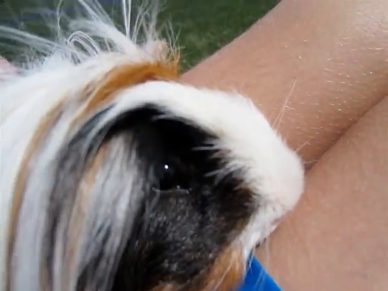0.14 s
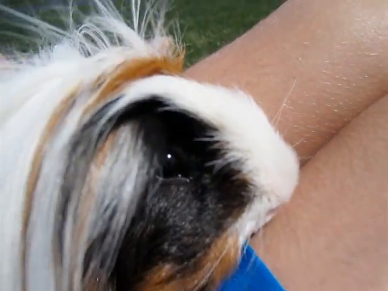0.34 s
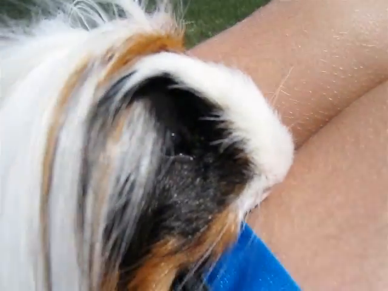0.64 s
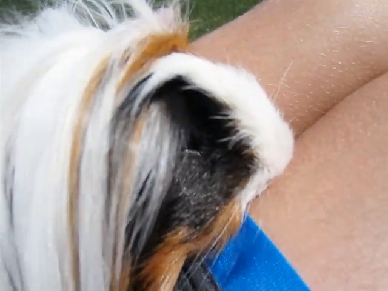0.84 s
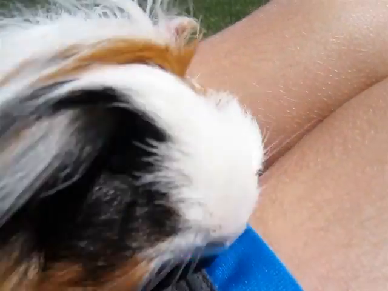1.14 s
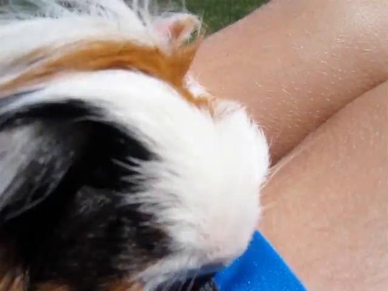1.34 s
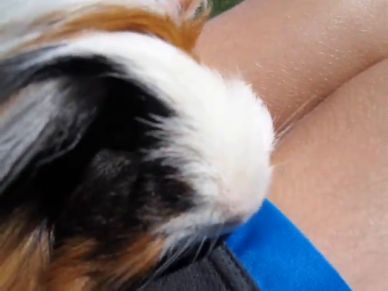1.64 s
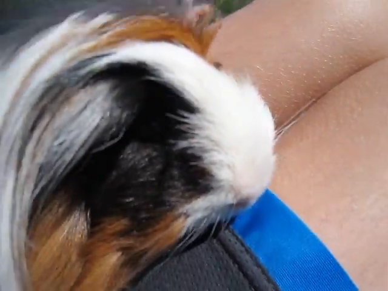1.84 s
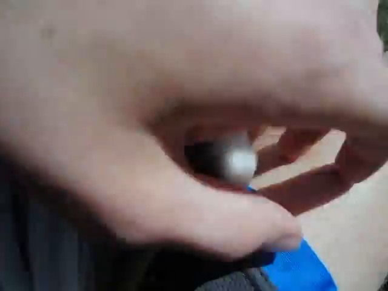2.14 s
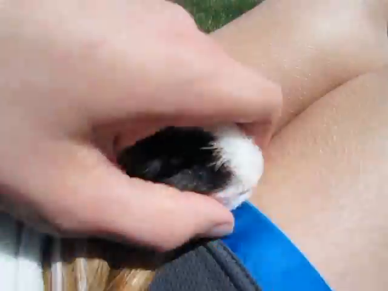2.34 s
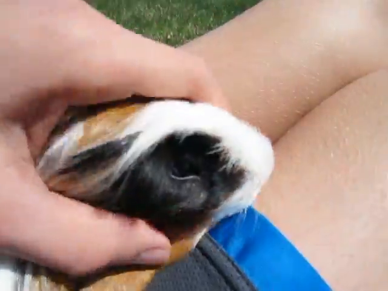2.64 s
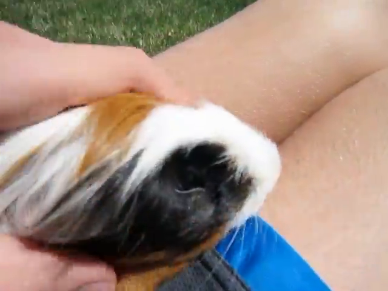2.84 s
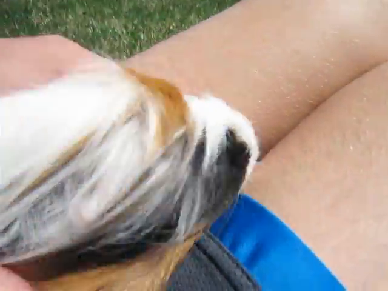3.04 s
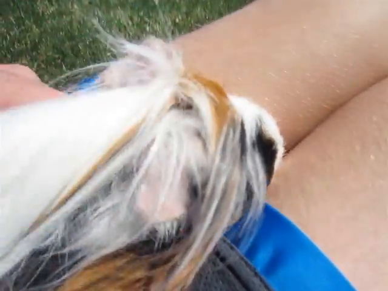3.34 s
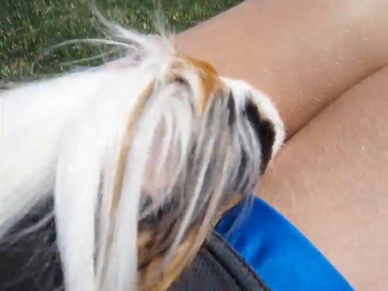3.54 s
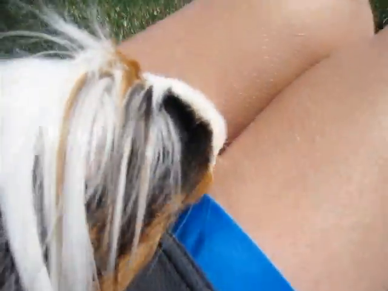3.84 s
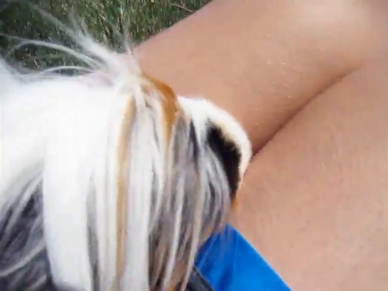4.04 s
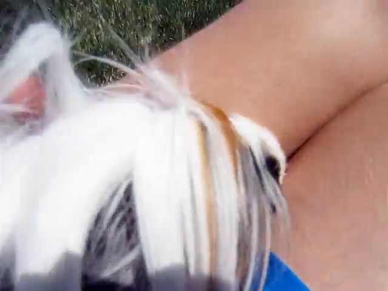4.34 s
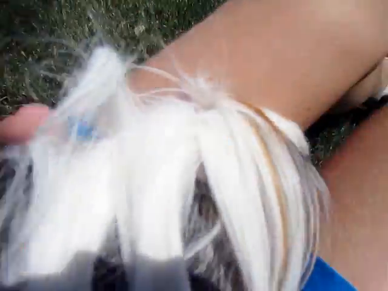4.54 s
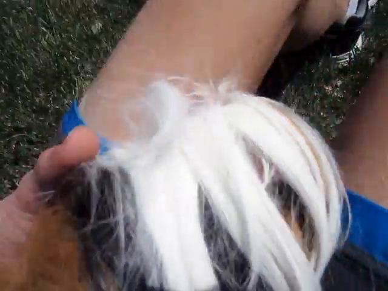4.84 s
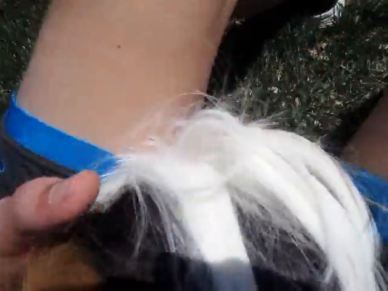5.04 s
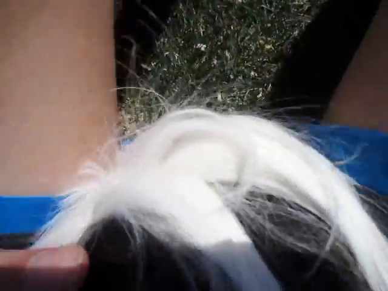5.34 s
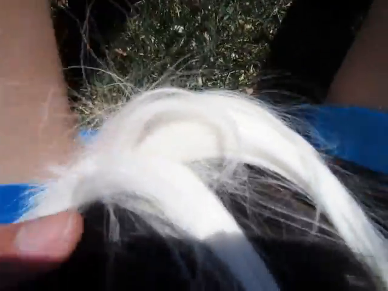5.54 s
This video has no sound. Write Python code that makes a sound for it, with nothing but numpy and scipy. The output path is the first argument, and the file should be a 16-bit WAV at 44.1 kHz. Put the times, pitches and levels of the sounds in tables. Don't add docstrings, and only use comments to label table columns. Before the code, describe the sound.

Quiet open air with a low distant engine hum; faint cloth creak and two hoarse bird calls at first. Then a small animal close by gives brief, knocking, hollow squeaks, sparse at first and soon in rapid groups, fading out before the end. Dry fur rustles under a stroking hand, strongest past the middle, and sharp handling clicks cluster last. Close handheld stereo microphone, almost no echo.

```python
import sys
import numpy as np
from scipy import signal
from scipy.fft import rfft, irfft
from scipy.io import wavfile
from scipy.ndimage import uniform_filter1d

SR = 44100
rng = np.random.default_rng(int(sys.argv[2]) if len(sys.argv) > 2 else 0)


def unload_wav(signal):
    wavfile.write(
        sys.argv[1],
        SR,
        np.round(np.clip(np.atleast_2d(signal).T, -1, 1) * 32767).astype(np.int16),
    )


def magnitude_from_level(level_db):
    exponent = np.asarray(level_db, float) / 20
    return 10 ** exponent


N = 250929

# (multiple of pitch, level [dB])
OVERTONES = [(2, 0), (3, -5), (4, -8)]
# (time [s], overtones re pitch [dB])
PRESS = [(.9, -21), (2.3, -28), (2.42, -20), (2.63, -27), (2.69, -25), (2.72, -27), (2.97, -24.5),
         (3.05, -18), (3.25, -15), (3.35, -16), (3.54, -15.5), (3.6, -11.5), (3.85, -19), (4.1, -15.5),
         (4.42, -15), (4.65, -19), (4.9, -19.5)]


def in_time(rows):
    s, *columns = np.transpose(rows)
    return [np.interp(np.arange(N) / SR, s, c) for c in columns]


def at_hz(points, hz):
    point_hz, level = np.transpose(points)
    return np.interp(np.log(hz), np.log(point_hz), level)


def rms_one(x):
    return x / np.sqrt(np.mean(x ** 2) + 1e-20)


def drift(rate):
    r = np.exp(-2 * np.pi * rate / SR)
    settling = 20000
    noise = rng.standard_normal(N + settling)
    return rms_one(signal.lfilter([1], [1, -2 * r, r * r], noise)[settling:])


def phase_of(hz):
    return 2 * np.pi * np.cumsum(hz) / SR


def filtered(x, order, hz, kind):
    return signal.sosfilt(signal.butter(order, hz, kind, fs=SR, output="sos"), x)


def banded_noise(spectrum, patchy_db):
    # (frequency [Hz], left-right correlation [-1..1])
    likeness = [(30, -0.96), (60, -0.42), (150, -0.33), (500, -0.53), (1500, -0.24), (5000, 0.24),
                (15000, 0.56)]
    out, edges = 0, 20 * 2 ** (np.arange(30) / 3)
    white = rng.standard_normal((2, 2, N))
    flicker = [drift(17.0) for k in range(3)]
    for k, (low, high) in enumerate(zip(edges, edges[1:])):
        hz = np.sqrt(low * high)
        if spectrum[0][0] < hz < spectrum[-1][0]:
            mid, side = filtered(white[k % 2], 3, [low, high], "band")
            alike = np.clip(at_hz(likeness, hz), -1, 1)
            gain = magnitude_from_level(at_hz(spectrum, hz) + patchy_db * flicker[k % 3])
            out = out + gain * (np.sqrt(1 + alike) * mid + np.sqrt(1 - alike) * side * [[1], [-1]])
    return out / np.sqrt(np.mean(out.mean(axis=0) ** 2))


def faint_tone(rows, rough):
    hz, level_db = in_time(rows)
    t = np.arange(N) / SR
    gate = np.clip(np.minimum(t - rows[0][0], rows[-1][0] - t) / 0.034, 0, 1)
    level = magnitude_from_level(level_db + 80 * rough * drift(70))
    return np.sqrt(2) * gate * level * np.sin(phase_of(hz * (1 + rough * drift(90))))


def air():
    # (frequency [Hz], spectral density [dB])
    air_spectrum = [(20, -12), (50, 0.5), (150, 1.5), (400, -6.5), (1000, -9.5), (2000, -29.5),
                    (4000, -31.5), (16000, -38.5)]
    return magnitude_from_level(-56) * banded_noise(air_spectrum, patchy_db=2.5)


def motor():
    # (time [s], frequency [Hz], level [dB])
    first_order = [(0.0, 84.3, -56), (0.33, 83.9, -48.5), (0.41, 83.8, -60), (0.49, 84.83, -52.5),
                   (1.19, 82.2, -51), (1.54, 78.6, -50), (1.63, 79.1, -69), (1.85, 78.2, -49.5),
                   (2.34, 84.16, -51.5), (2.42, 82.8, -48.5), (2.57, 82.77, -52.5), (5.1, 82.92, -53),
                   (5.69, 83, -48.5)]
    # (time [s], level [dB])
    second_order = [(0.0, -65), (0.2, -50.5), (0.58, -67.5), (0.65, -57), (0.95, -69), (2.57, -56.5),
                    (3.14, -74), (3.26, -49.5), (3.41, -72.5), (5.05, -57.5), (5.2, -80), (5.69, -57.5)]
    hz, first_db = in_time(first_order)
    phase = phase_of(hz + 0.573 * drift(5.6))
    first = magnitude_from_level(first_db + 1.2 * drift(4.5) + 0.68 * drift(40)) * np.sin(phase)
    second = magnitude_from_level(in_time(second_order)[0] + drift(20)) * np.sin(1.96 * phase)
    third = magnitude_from_level(-67 + 3 * drift(3)) * np.sin(2.95 * phase)
    return np.sqrt(2) * (first + second + third)


def bird():
    # (start [s], length [s], level [dB])
    call_times = [
        (.275, .18, -61),
        (.55, .14, -62),
        (.72, .1, -68),
    ]
    # (frequency [Hz], width [Hz], level [dB])
    throat_bands = [(1000, 83, -3), (1546, 36, -2.5), (1620, 39, -2.5), (1710, 55, -13), (2300, 80, -20)]
    # (time [s], frequency [Hz], level [dB])
    cores = [
        [(.275, 1560, -66), (.36, 1545, -67), (.46, 1530, -71)],
        [(.55, 1600, -68), (.62, 1560, -68), (.69, 1530, -70)],
    ]
    rise_s, sag_db = 0.0098, -5
    t, white = np.arange(N) / SR, rng.standard_normal(N)
    breath, calls = 0, 0
    for hz, width, db in throat_bands:
        breath = breath + magnitude_from_level(db) * rms_one(filtered(white, 1, [hz - width / 2, hz + width / 2], "band"))
    for s, length, db in call_times:
        knots = [s, s + rise_s, s + length, s + length + 2 * rise_s]
        calls = calls + magnitude_from_level(db) * np.interp(t, knots, [0, 1, magnitude_from_level(sag_db), 0])
    return breath * calls + sum(faint_tone(core, rough=0.02) for core in cores)


def cloth():
    # (time [s], frequency [Hz], level [dB])
    groan = [
        (4.79, 160.6, -55),
        (4.858, 204, -43),
        (4.93, 196, -62),
    ]
    # (time [s], frequency [Hz], level [dB])
    creak = [
        (.04, 650, -75),
        (.15, 709, -60.5),
        (.23, 660, -56),
    ]
    return faint_tone(groan, rough=0.015) + faint_tone(creak, rough=0.07)


def stroking_db():
    # (peak [s], swell [s], fade [s], level [dB])
    strokes = [(.177, 0.12, 0.11, -63.5), (1.63, 0.037, 0.17, -74), (1.95, .08, 0.35, -70),
               (2.174, 0.031, 0.049, -60), (2.27, 0.079, 0.16, -66), (2.68, 0.18, 0.15, -66.5),
               (3.08, 0.05, 0.11, -59), (3.15, 0.1, 0.098, -58.5), (3.55, 0.4, 0.33, -65),
               (3.97, 0.072, 0.25, -60), (4.2, 0.085, 0.054, -55.5), (4.25, 0.056, 0.026, -57),
               (4.497, 0.13, 0.031, -61.5), (4.74, 0.044, 0.045, -58), (4.805, 0.036, 0.02, -51),
               (4.9, 0.096, 0.14, -61), (5.17, 0.091, .05, -65.5), (5.3, 0.0444, 0.1, -68.5),
               (5.445, 0.035, 0.44, -66)]
    flank_db, resting_db = 7.5, -75
    t = np.arange(0, N / SR + .002, .002)
    power = magnitude_from_level(resting_db) ** 2
    for s, swell, fade, db in strokes:
        power = power + magnitude_from_level(db - flank_db * np.abs(t - s) / np.where(t < s, swell, fade)) ** 2
    return in_time(np.transpose([t, 10 * np.log10(power)]))[0]


def hand():
    # (frequency [Hz], spectral density [dB])
    fur_spectrum = [(2000, -21), (3000, -4.5), (4500, -0.5), (7500, -1), (10000, -3.5), (17000, 0)]
    # (frequency [Hz], spectral density [dB])
    rub_spectrum = [(200, 1), (300, 7.5), (700, -1), (1600, -3.5), (2500, -8.5), (4500, -24.5)]
    # (time [s], level of the top treble [dB])
    sheen = [(0, -3), (2.18, 3.5), (2.27, 7.5), (2.4, -4), (3.12, -4), (4.0, -10), (4.2, -5.5), (4.5, 0),
             (4.8, 3), (5.69, -3.5)]
    hiss_db = stroking_db()
    rub_db = -59.5 + 0.61 * (hiss_db + 70)
    firmness = np.clip((hiss_db + 64.0) / 8, .2, 1)
    grain_db = firmness * np.clip(3.1 * drift(300) + 0.51 * drift(30), -7, 5.5)
    fur = banded_noise(fur_spectrum, patchy_db=2.0)
    treble = signal.sosfiltfilt(signal.butter(2, 8900, "high", fs=SR, output="sos"), fur)
    fur = fur + (magnitude_from_level(in_time(sheen)[0]) - 1) * treble
    return magnitude_from_level(hiss_db + grain_db + 2.5) * fur + magnitude_from_level(rub_db) * banded_noise(rub_spectrum, patchy_db=2.3)


def zip_of_hair():
    # (peak [s], width [s], frequency [Hz], level [dB])
    caught_lock = (3.105, .04, 4450, -70)
    s, width, hz, db = caught_lock
    band = filtered(rng.standard_normal(N), 2, [hz * 0.99, hz * 1.01], "band")
    return rms_one(band) * magnitude_from_level(db + 3.0 * drift(60)) * np.exp(-((np.arange(N) / SR - s) / width) ** 2)


def ticks():
    # (time [s], peak level [dB], softness [ms])
    contacts = [(0.244, -38.5, 0.17), (0.8096, -48, 0.057), (1.432, -38.5, 0.24), (3.015, -38.5, 0.015),
                (3.472, -58, 0.017), (3.619, -57.5, 0.023), (2.184, -37, 0.024), (2.243, -39, 0.016),
                (4.2058, -35, 0.025), (4.286, -49, 0.036), (4.7945, -34.5, .02), (5.276, -36, 0.065),
                (5.2972, -42, 0.07), (5.3099, -29.5, 0.039), (5.4293, -33, 0.071), (5.4369, -33, 0.032),
                (5.4473, -28.5, 0.027), (5.4608, -36.5, 0.032), (5.4666, -36, 0.049), (5.532, -36.5, 0.035),
                (5.5485, -27.5, 0.012), (5.558, -38, 0.036), (5.6884, -35.5, 0.048)]
    lead_s = .0004
    out, t = np.zeros(N + 300), np.arange(300) / SR
    for s, level_db, soft_ms in contacts:
        soft = np.clip(soft_ms, .015, .35) / 1000
        dip = np.exp(-((t - lead_s) / soft) ** 2)
        rebound = 0.49 * np.exp(-((t - .0007) / 0.00032) ** 2)
        rattle = signal.lfilter([1], [1, -np.exp(-1 / (soft * SR))], rng.standard_normal(300))
        rattle = 0.19 * rms_one(rattle) * np.exp(-t / 0.00086)
        at = round((s - lead_s) * SR)
        out[at:at + 300] += magnitude_from_level(level_db + 5.0) * (rebound - dip + rattle)
    return filtered(out[:N], 1, 500, "high") * magnitude_from_level([[-.8], [.8]])


def rasp():
    return rms_one(filtered(rng.standard_normal(N), 1, [1100, 2300], "band"))


def overtones(phase, press_db, thinning_db):
    slack_db = np.clip(-12 - press_db, 0, 8)
    out = 0
    for k, db in OVERTONES:
        level = magnitude_from_level(db - thinning_db * np.sqrt(k - 1) - slack_db * (k - 2))
        out = out + level * np.cos(k * phase + .6 * k)
    return out


def flick(s, length, from_hz, to_hz, level_db):
    attack_s, shoulder_db, glide_bend = 0.0024, 1, 1.29
    release_s, release_share = .005, .2
    shoulder_s = max(length * (1 - release_share) - release_s, attack_s * 1.44)
    t = np.linspace(0, length, 24)
    size = np.interp(t, [0, attack_s, shoulder_s, length], magnitude_from_level([-35, 0, shoulder_db, -35]))
    hz = from_hz + (to_hz - from_hz) * (t / length) ** glide_bend
    return np.transpose([s + t, hz, level_db + 20 * np.log10(size)])


def whistles():
    # (time [s], pitch [Hz], peak level [dB])
    glides = [
        [(2.677, 1010, -40), (2.68, 1050, -26), (2.686, 1150, -30), (2.694, 1220, -32), (2.699, 1210, -38),
         (2.701, 1050, -41)],
        [(2.343, 560, -45), (2.35, 626, -37), (2.359, 730, -30), (2.366, 750, -35), (2.369, 800, -56)],
        [(4.036, 645, -41), (4.039, 661, -30.5), (4.057, 727, -22.5), (4.062, 672, -26), (4.069, 696, -28),
         (4.072, 780, -34)],
        [(4.1135, 740, -48), (4.117, 713, -21.5), (4.128, 762, -20.5), (4.135, 687, -25.5), (4.1375, 890, -20),
         (4.1395, 900, -52)],
        [(3.233, 690, -49), (3.2395, 713, -27.5), (3.243, 712, -24), (3.25, 743, -24.5), (3.254, 850, -22.5),
         (3.256, 900, -44)],
        [(3.811, 582.5, -38), (3.818, 653, -34), (3.829, 718, -25), (3.842, 703, -26), (3.848, 780, -23),
         (3.854, 985, -21.5), (3.858, 1065, -26), (3.862, 1270, -50)],
        [(3.5395, 940, -42), (3.5415, 985, -19.5), (3.544, 1050, -17.5), (3.548, 1120, -28), (3.552, 1230, -41),
         (3.554, 1250, -50)],
        [(4.323, 660, -31), (4.326, 679, -28.5), (4.337, 775, -19.5), (4.345, 690, -27), (4.349, 766, -21),
         (4.351, 912, -48)],
        [(4.419, 780, -43), (4.422, 734, -31), (4.426, 688, -24), (4.433, 667, -32), (4.436, 810, -27),
         (4.439, 700, -54)],
    ]
    # (start [s], length [s], from [Hz], to [Hz], peak level [dB])
    flicks = [(0.897, 0.028, 612, 746, -30), (2.341, 0.018, 1136, 1400, -42.5),
              (2.4213, 0.0097, 1025, 1150, -37.5), (2.63, 0.021, 710, 870, -27),
              (2.713, 0.017, 833, 724, -23), (2.97, 0.0098, 900, 1000, -21), (3.051, 0.011, 997, 1250, -19),
              (3.2295, 0.0055, 890, 1050, -27), (3.2342, 0.0044, 1065, 960, -28),
              (3.272, 0.0056, 960, 1320, -21.5), (3.344, 0.013, 936, 1045, -17.5),
              (3.623, 0.0074, 962, 1420, -20.5), (4.072, 0.016, 825, 1220, -18.5),
              (4.142, 0.026, 802, 1288, -20), (4.207, 0.022, 384, 400, -42.5),
              (4.365, 0.014, 947, 1320, -17.5), (4.441, 0.012, 785, 590, -28),
              (4.659, 0.016, 815, 990, -24.5), (4.884, 0.014, 1150, 1390, -36),
              (4.889, 0.03, 703, 795, -28.5)]
    # (time [s], width [s], half-pitch line re pitch [dB])
    doubling = [(2.42, 0.019, 2), (2.692, 0.014, -0.5), (3.841, 0.0064, -13), (4.067, 0.0038, -11.5),
                (4.133, 0.0029, -13), (4.43, 0.031, -16), (3.236, 0.0066, -9.5), (4.348, 0.0018, -8.5),
                (4.891, 0.0063, -14)]
    unsteady, breath_db = .06, -19
    out, wobble, clock = np.zeros(N), drift(220), np.arange(N) / SR
    half = magnitude_from_level(-37.0) + sum(magnitude_from_level(db) * np.exp(-((clock - s) / width) ** 2) for s, width, db in doubling)
    press_db, = in_time(PRESS)
    breath = rasp()
    for rows in glides + [flick(*n) for n in flicks]:
        s, hz, level_db = np.transpose(rows)
        span = np.arange(int(s[0] * SR), int(s[-1] * SR) + 40)
        t = span / SR
        size = uniform_filter1d(np.interp(t, [*s, t[-1]], [*magnitude_from_level(level_db), 0]), size=24)
        pitch = np.interp(t, s, hz)
        alternation = np.minimum(half[span], .3)
        waver = (.01 + unsteady * alternation) * wobble[span]
        phase = phase_of(pitch * (1 + waver)) + rng.uniform(0, 2 * np.pi)
        thinning_db = 6.8 * np.clip((pitch - 760) / 150, 0, 1)
        edge = magnitude_from_level(press_db[span] + 0.73 * wobble[span - 400]) * overtones(phase, press_db[span], thinning_db)
        gush_db = press_db[span] + breath_db + 20 * alternation - thinning_db
        edge += magnitude_from_level(gush_db) * breath[span] * (1 + np.cos(phase))
        edge *= (size.max() / (size + 1e-4)) ** 0.45
        subharmonic = half[span] * (np.cos(phase / 2) + 0.18 * np.cos(1.6 * phase))
        out[span] += size * (np.cos(phase) + edge + subharmonic)
    return out


def chuts():
    # (time [s], peak level [dB], ring [Hz], length [ms], chest re ring [dB])
    closures = [(0.89, -28, 933, 3.2, 1.5), (0.894, -33, 1050, 4.9, -16), (1.0804, -35, 700, 4.1, -27),
                (1.0837, -24.5, 694, 3.1, -19), (1.0878, -27, 750, 1.1, -19),
                (1.0907, -23.5, 920, 1.4, -17), (1.106, -30.5, 800, 2.8, -5.5),
                (1.1484, -35, 645, 2.9, -25), (1.1522, -25.5, 730, 4.7, -24),
                (1.1581, -22.5, 940, 1.3, -17.5), (1.1752, -29, 803, 3.7, -16),
                (2.1403, -32.5, 1040, 4.3, 1.5), (2.1583, -35.5, 646, 3.8, -20),
                (2.3224, -29.5, 940, 4.1, 5), (2.3324, -30, 1040, 4, 3.5), (2.3391, -34, 650, 1.5, -20),
                (2.341, -28, 905, 1.8, -16), (2.3446, -29, 650, 1.7, -20), (2.4072, -31, 1000, 3.5, 7.5),
                (2.4101, -24.0, 930, 5, -10), (2.4146, -35, 1060, 5.1, -12), (2.4203, -32, 1035, 3.6, 2),
                (2.5959, -32.0, 900, 1.97, 3), (2.5984, -28.5, 965, 4.3, -4.5),
                (2.6031, -31, 650, 3, -24), (2.6069, -25, 970, 1.9, -11), (2.6099, -34.5, 744, 3.6, -20),
                (2.613, -24.5, 950, 1.8, -17), (2.6205, -29, 750, 5.4, -20),
                (2.6261, -27.5, 807, 3.6, -18), (2.6674, -23, 930, 3.8, -0.5),
                (2.6727, -29, 1060, 3.9, 4), (2.6765, -34, 1160, 3.9, -1), (2.7042, -25, 850, 3.4, -10),
                (2.9197, -29.5, 1000, 4.6, 0.5), (2.9326, -26.5, 736, 2.5, -21),
                    (2.9371, -27.5, 770, 3.6, -4), (2.9441, -26.0, 850, 3.75, -20),
                    (2.9501, -24, 840, 2.9, -21), (2.9599, -24, 840, 2.5, -16),
                    (3.0039, -26.5, 714, 3.1, -28), (3.008, -25, 950, 2, -17), (3.0131, -25, 1110, 3.2, -1),
                    (3.0206, -22.5, 800, 4.5, -21), (3.0259, -22.5, 840, 2.9, -11),
                    (3.0365, -22.5, 900, 2.7, -20), (3.2607, -20, 900, 2.4, -20),
                    (3.31, -22, 760, 5.4, -24), (3.3209, -27.5, 700, 0.98, -3), (3.324, -19.0, 900, 2, -20),
                    (3.3291, -19.5, 905, 2.3, -18), (3.338, -33, 794, 7.1, -22),
                    (3.3408, -22.5, 1000, 4.9, -12), (3.4986, -30, 950, 2, -7),
                    (3.5046, -26.0, 900, 2, -13), (3.5086, -23, 804, 3.7, -18),
                    (3.5129, -22, 705, 1.5, -22), (3.5159, -23.5, 749, 4.3, -8), (3.5195, -23, 970, 2, -9),
                    (3.5306, -22, 900, 3.1, -20),
                (3.5761, -22.5, 790, 3.1, -15), (3.5873, -24.5, 1060, 4.7, -0.5),
                  (3.5969, -19.5, 930, 1.6, -10.5), (3.6026, -22.5, 1000, 1.4, -11),
                  (3.6071, -21, 940, 1.2, -5.5), (3.6102, -20.5, 813, 3.8, -17),
                  (3.6168, -19.5, 940, 2.5, -12), (4.3189, -28, 747, 4.3, -14),
                  (4.3553, -19, 920, 2.2, -17), (4.3615, -18, 960, 1.9, -20), (4.4047, -25.5, 750, 3, -13),
                  (4.4082, -31.5, 1220, 4, -23), (4.4107, -26, 810, 3.1, -6), (4.418, -25.5, 750, 4.8, -7),
                  (4.607, -32.5, 898, 4.3, 6), (4.6145, -30, 1053, 4.2, -10),
                  (4.6236, -27.5, 800, 3.66, -13), (4.6293, -27, 785, 2.9, -20),
                  (4.6354, -28, 850, 2.4, -14), (4.64, -25, 860, 3, -12), (4.6452, -28.0, 860, 3.54, -24),
                  (4.6499, -28, 910, 3.8, -25), (4.6549, -26, 846, 2.9, -18), (4.8753, -27, 1026, 3.4, -9),
                  (4.8808, -29.5, 1140, 3.4, 1.5)]
    further_closures = [(3.3128, -26, 1000, 2.2, -12), (3.6127, -24, 1050, 2.2, -18),
                        (3.5785, -30, 1000, 1.5, -14), (4.3206, -33, 1150, 1.6, -18),
                        (4.4064, -31, 1150, 1.8, -18), (4.4124, -32, 1150, 1.8, -12),
                        (4.4355, -32, 1050, 2, -18), (2.4184, -33, 700, 1.5, 2), (3.0145, -30, 1000, 1.5, -10),
                        (3.2536, -28, 1000, 1.6, -18)]
    # (time [s], mouth level [dB], nose level [dB])
    opening = [(.9, -25, -31), (1.09, -16, -29), (1.15, -20, -27), (2.14, -26, -31), (2.32, -26, -14),
               (2.335, -24, -15), (2.41, -27, -17), (2.6, -22, -24), (2.67, -18, -33), (2.94, -20, -35),
               (3.01, -18, -36), (3.26, -18, -17), (3.32, -9, -23), (3.51, -16, -20), (3.53, -10, -15),
               (3.58, -9, -15), (3.6, -11, -26), (3.62, -18, -15), (4.32, -11, -20), (4.36, -12, -24),
               (4.41, -3.5, -26), (4.61, -15, -32), (4.65, -14, -38), (4.88, -20, -26)]
    mouth_hz, nose_hz, mouth_fade_s = 2010, 2760, 0.00029
    chest_hz, chest_t60_s = 380, 0.034
    cheek_hz, cheek_db, cheek_rise_s = 1252, -11.5, .0018
    swell_s = .0007
    first_cycle_share, aftersnap_db = 0.93, -10
    out, t, (press_db,) = np.zeros(N), np.arange(-80, 1200) / SR, in_time(PRESS)
    breath, (mouth_db, nose_db) = rasp(), in_time(opening)
    late = np.maximum(t, 0)
    for s, level_db, hz, length_ms, chest_db in closures + further_closures:
        luck = rng.uniform(-1, 1, 3)
        at = round(s * SR) - 96
        here = slice(at, at + len(t))
        decay_s = np.clip(length_ms, 1.2, 6) / 1000
        size = np.exp(-np.abs(t / np.where(t < 0, swell_s, decay_s)) ** 3)
        phase = 2 * np.pi * hz * t
        edge = 0.63 * breath[here]
        for k, db in OVERTONES:
            edge = edge - magnitude_from_level(db) * np.sin(k * phase + .5 * k * luck[0])
        grow = 1 - (1 - first_cycle_share) * np.exp(-(late * hz) ** 2)
        cheek_phase = 2 * np.pi * cheek_hz * (1 + 0.033 * luck[2]) * t + 3 * luck[1]
        cheek = magnitude_from_level(cheek_db + 4.3 * luck[0]) * np.tanh((late / cheek_rise_s) ** 2) * np.sin(cheek_phase)
        burst = size * (cheek - grow * np.sin(phase)) + magnitude_from_level(press_db[at] - 9.0) * size ** 1.1 * edge
        chest = -np.sin(2 * np.pi * chest_hz * (1 + 0.058 * luck[1]) * late) * magnitude_from_level(-60 * late / chest_t60_s)
        struck = np.exp(-np.abs(t) / np.where(t < 0, .0002, mouth_fade_s))
        waver = 2 * np.pi * (1 + .06 * luck[2]) * t
        mouth = magnitude_from_level(mouth_db[at]) * np.sin(mouth_hz * waver)
        nose = magnitude_from_level(nose_db[at]) * np.sin(nose_hz * waver)
        snap = struck * (mouth + nose)
        aftersnap = magnitude_from_level(aftersnap_db) * size * np.roll(snap, round(SR / hz))
        out[here] += magnitude_from_level(level_db) * (burst - snap - aftersnap + magnitude_from_level(chest_db) * chest)
    return out


def guinea_pig():
    return filtered(filtered(whistles() + chuts(), 12, 3330, "low"), 2, 170, "high")


def yard(voice):
    # (delay [s], left level [dB], right level [dB])
    echoes = [
        (.0047, -49, -26.5),
        (.0093, -45.5, -27.5),
        (.0142, -33, -42.5),
        (.0203, -31, -36.5),
        (.0271, -32, -39.5),
    ]
    dull = filtered(voice, 1, [500, 1800], "band")
    out = voice
    for s, left_db, right_db in echoes:
        out = out + magnitude_from_level([[left_db], [right_db]]) * np.roll(dull, round(s * SR))
    return out


def scene():
    far = air() + motor() + bird()
    close = cloth() + hand() + zip_of_hair() + ticks()
    return far + close + yard(guinea_pig())


def band_limit(x):
    return signal.sosfilt(signal.butter(12, 16370, fs=SR, output="sos"), x)


def record(dry):
    # (frequency [Hz], right over left [dB])
    rightward = [(100, -0.5), (1000, 0.5), (2500, 2), (6000, 3.5), (15000, 4.5)]
    # (frequency [Hz], level [dB])
    mic_colour = [(8000, 0), (10000, -6.5), (11200, -15.5), (12000, -26.5), (13000, -23), (15000, -10.5)]
    # (frequency [Hz], frequency [Hz])
    whine_lines = (7852, 7882)
    left_lag_s, cutoff_hz, whine_db, self_noise_db = 3.2e-5, 15765, -81.5, -81
    hz = np.fft.rfftfreq(N, 1 / SR) + 1e-3
    passed = hz < cutoff_hz
    tilt = at_hz(rightward, hz) / 2
    ports = np.array([magnitude_from_level(-tilt) * np.exp(-2j * np.pi * hz * left_lag_s), magnitude_from_level(tilt) + 0j])
    heard = irfft(rfft(dry, axis=1) * ports * magnitude_from_level(at_hz(mic_colour, hz)) * passed, N, axis=1)
    whine = 0
    for line_hz in whine_lines:
        whine = whine + magnitude_from_level(whine_db + 1.2 * drift(5)) * np.sin(phase_of(line_hz + 2.9 * drift(5)))
    noise_shape = np.where(hz > 12500, 1, .3 * (hz > 10500)) * passed
    self_noise = magnitude_from_level(self_noise_db) * irfft(rfft(rng.standard_normal((2, N))) * noise_shape, N)
    return band_limit(heard + whine + self_noise)


dry = scene()
out = record(dry)
unload_wav(out)
```